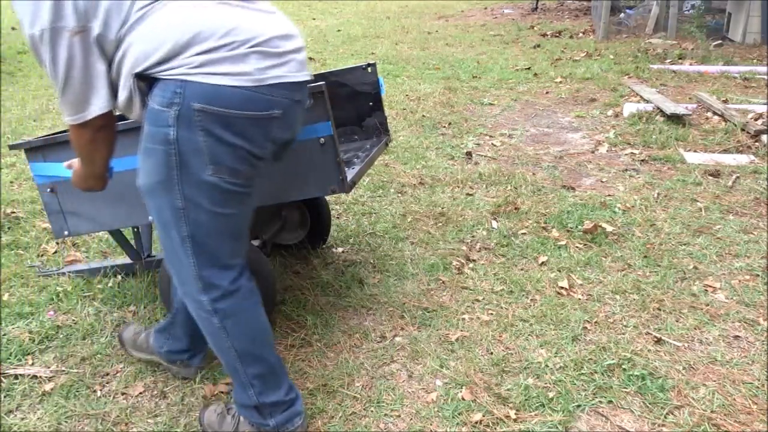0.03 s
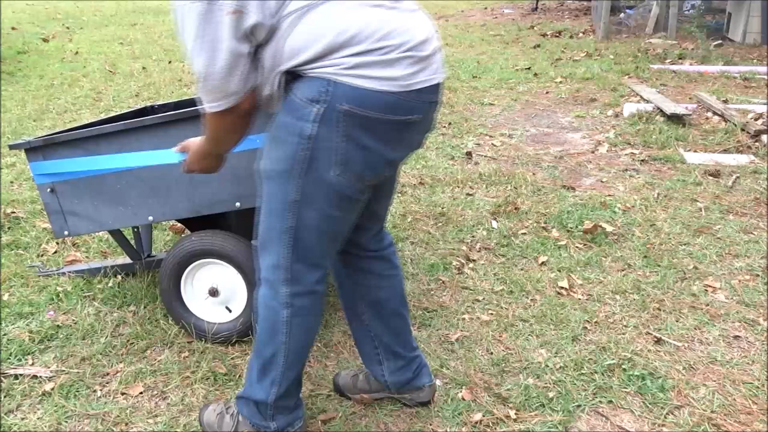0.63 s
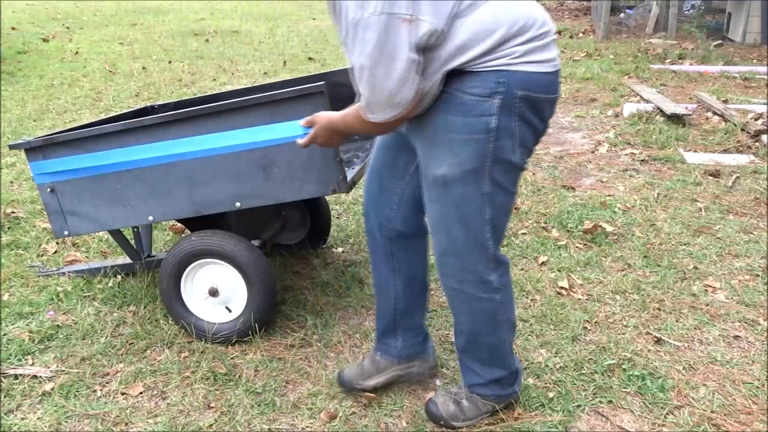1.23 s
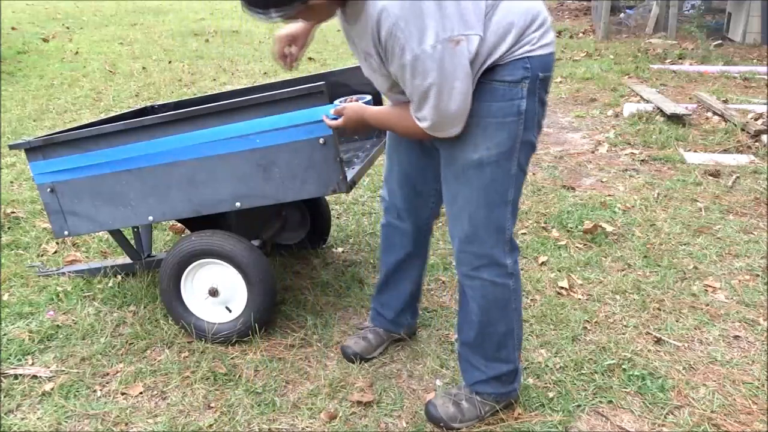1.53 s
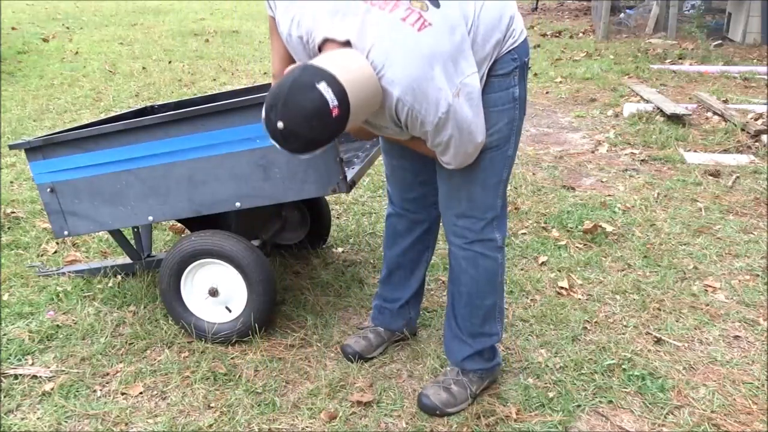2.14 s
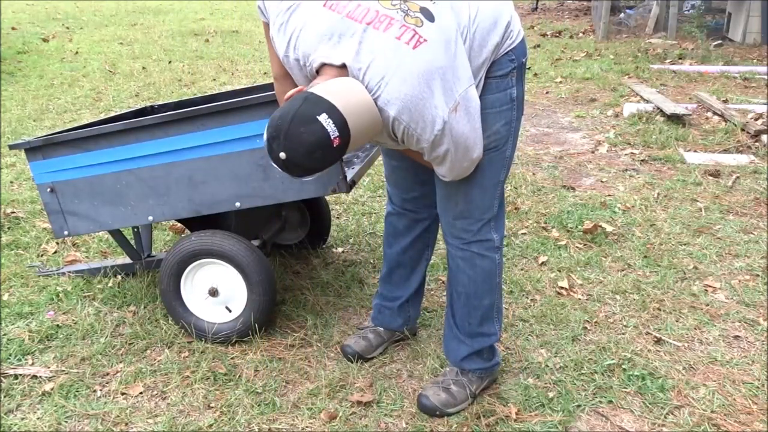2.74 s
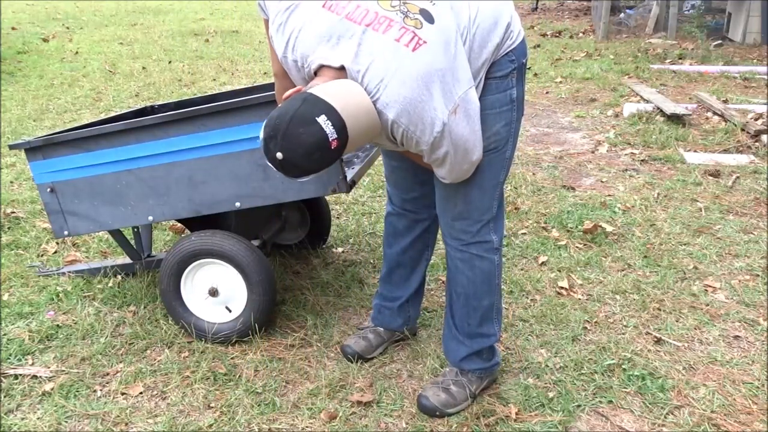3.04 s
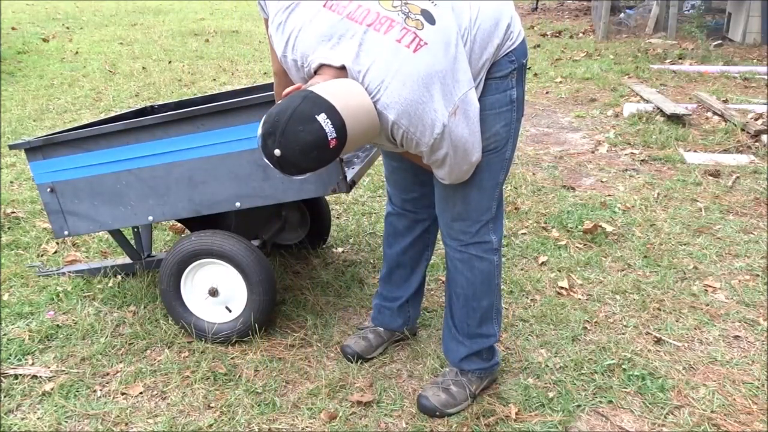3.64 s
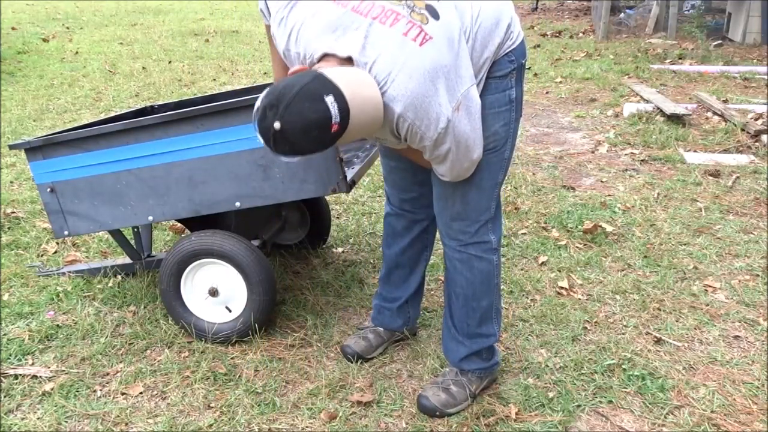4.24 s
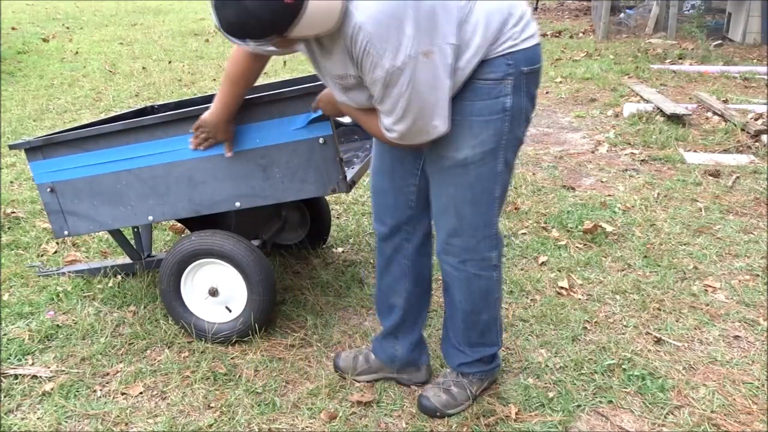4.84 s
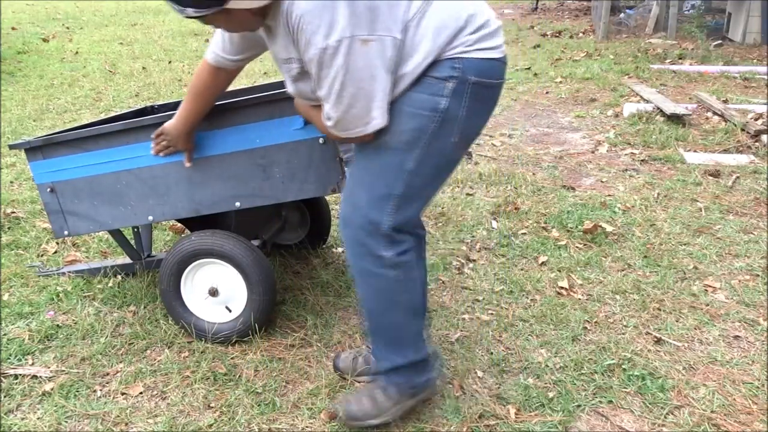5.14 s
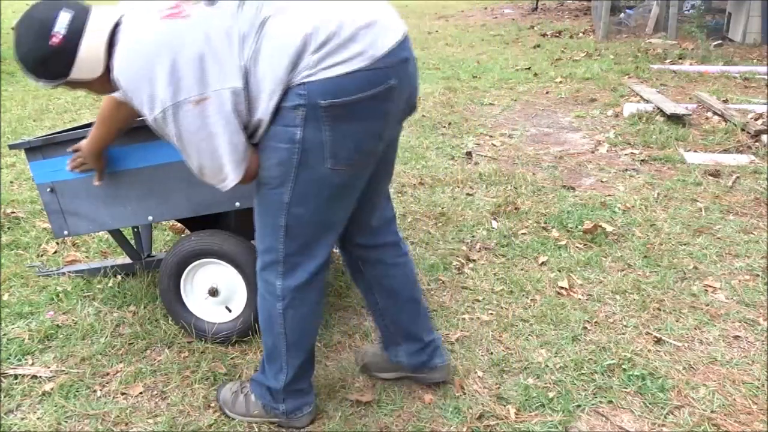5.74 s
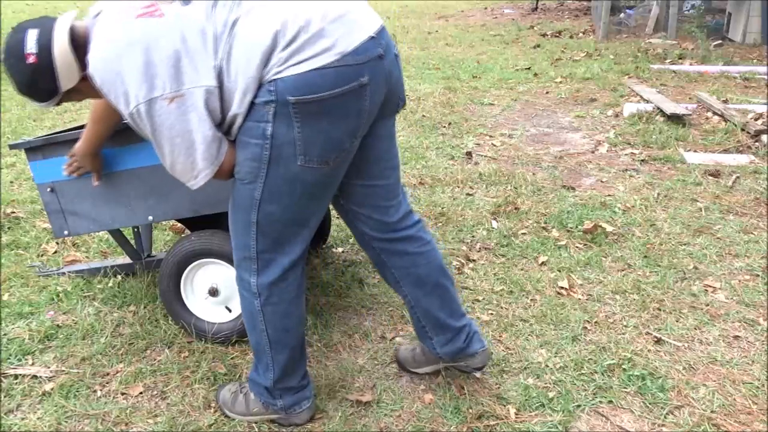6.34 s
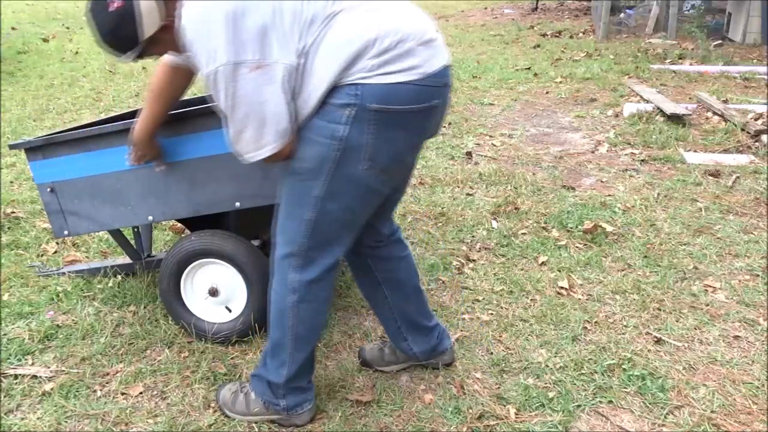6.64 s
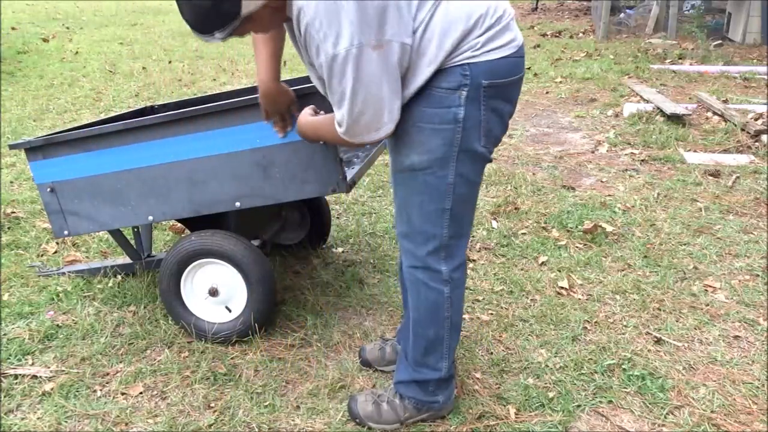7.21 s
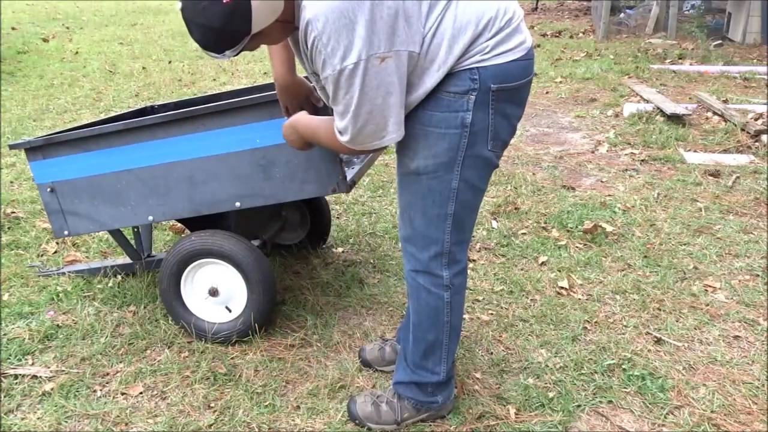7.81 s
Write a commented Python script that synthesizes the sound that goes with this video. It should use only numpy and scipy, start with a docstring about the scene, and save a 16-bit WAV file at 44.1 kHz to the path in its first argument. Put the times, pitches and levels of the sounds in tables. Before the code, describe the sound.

Masking tape rasps off a roll, then a hand rubs it onto a steel cart with soft knocks, while faint birds chirp outdoors.

```python
"""Masking tape is ripped off its roll along the side of a steel garden cart, then rubbed down by hand.
Glue threads snap in stick-slip bursts and drum the taut strip; skin catches on the tape's crepe ridges.
Hand and roll bump the panel now and then, exciting its damped modes. Birds whistle and chirp in the
trees around the lawn. Close by, a small camera motor kicks its housing 30 times a second, with one
short rest, over soft wind and hiss."""
import sys
import numpy as np
from scipy import signal
from scipy.fft import rfft, irfft, next_fast_len
from scipy.io import wavfile
from scipy.ndimage import uniform_filter1d

SR = 44100
rng = np.random.default_rng(int(sys.argv[2]) if len(sys.argv) > 2 else 0)


def output_pcm(signal):
    """Save a mono or channel-first signal as 16-bit PCM at the path in sys.argv[1].

    Samples are clipped to [-1, 1] before scaling.
    """
    pcm = np.clip(np.atleast_2d(signal).T, -1, 1) * 32767
    wavfile.write(sys.argv[1], SR, np.round(pcm).astype(np.int16))


N = 347067
T = np.arange(N) / SR
PADDED = next_fast_len(N, real=True)
BINS = np.fft.rfftfreq(PADDED, 1 / SR)


def amp(db):
    """Amplitude ratio of a level in decibels."""
    return 10 ** (np.asarray(db) / 20)


def unit_rms(x):
    """Normalisation to an rms of 1."""
    return x / np.sqrt(np.mean(x ** 2) + 1e-20)


def response(curve):
    """Gain in every bin, interpolated over log frequency from rows of frequency_hz, gain_db."""
    hz, db = np.transpose(curve)
    return amp(np.interp(np.log(BINS + 1), np.log(hz + 1), db))


def colour(x, gain):
    """Zero-phase filtering: the spectrum is multiplied by a gain."""
    return irfft(rfft(x, PADDED) * gain, PADDED)[:N]


def split(x, hz):
    """Crossover into a low and a high band, each of rms 1."""
    low = colour(x, 1 / (1 + (BINS / hz) ** 8))
    return unit_rms(low), unit_rms(x - low)


def add(mix, start_s, sound):
    """Superposition of a sound on the mix, in place."""
    part = mix[max(round(start_s * SR), 0):][:len(sound)]
    part += sound[:len(part)]


def wobble(rate_hz, size=N):
    """Random modulation: low-passed noise of rms near 1."""
    padded = next_fast_len(size, real=True)
    hz = np.fft.rfftfreq(padded, 1 / SR)
    spectrum = rfft(rng.standard_normal(padded)) / np.sqrt(1 + (hz / rate_hz) ** 6)
    return unit_rms(irfft(spectrum, padded))[:size]


def ring(x, modes):
    """Forced response of damped modes, given as frequency_hz, bandwidth_hz, gain_db."""
    out = 0
    for hz, width_hz, db in modes:
        radius = np.exp(-np.pi * width_hz / SR)
        pole = radius * np.exp(2j * np.pi * hz / SR)
        out = out + amp(db) * signal.lfilter([1 - radius], [1, -pole], x).imag
    return out


def shot_noise(per_s, spread_db=2.5):
    """A Poisson train of tiny snaps, a few much larger than the rest."""
    size = amp(spread_db * np.minimum(rng.exponential(1, N), 4))
    return unit_rms(size * rng.choice([-1, 1], N) * (rng.random(N) < per_s / SR))


def gliding_resonances(x, track, width_hz, unsteady, patchy_db):
    """Time-varying filter: two narrow resonances glide while changing contact mottles the spectrum."""
    hz, t, spectra = signal.stft(x, SR, nperseg=1024)
    times, *columns = np.transpose(track)
    low_hz, high_hz, boost_db = (np.interp(t, times, column) for column in columns)
    patches = uniform_filter1d(rng.standard_normal(spectra.shape), size=5, axis=0)
    patches = unit_rms(uniform_filter1d(patches, size=7, axis=1))
    peaks = sum(np.exp(-((hz[:, None] - centre) / width_hz) ** 2) for centre in (low_hz, high_hz))
    gain_db = boost_db * peaks * (1 + unsteady * patches[::-1]) + patchy_db * patches
    return signal.istft(spectra * amp(gain_db), SR)[1][:N]


def peel(slip_hz=70, rasp_db=-4.0, release_s=0.08):
    """Stick-slip: snapping glue threads drum the taut strip, whose resonances shift as it lengthens."""
    # spectra of the short, half-length and long strip: frequency_hz, gain_db
    short = [(88, -49), (150, -21), (264, -15.5), (543, -2.5), (727, -0.5), (883, -9.5), (1250, -3),
             (1750, -2), (2740, -9.5), (3070, -6), (3460, -12), (6700, -8), (14900, -15.5), (15800, -10.5)]
    half = [(88, -55), (150, -27), (285, -6), (347, -16.5), (405, -1.5), (512, 0), (901, -16.5), (1070, -8),
            (1680, -16), (2080, -10.5), (2740, -13.5), (8640, -15), (11600, -24.5), (14600, -18.5),
            (15800, -22)]
    long = [(88, -55), (150, -23), (340, -7), (474, -5), (532, -5.5), (833, -6), (1010, -19), (1350, -13),
            (1560, -4), (1800, -9.5), (2250, -14), (2850, -10.5), (3350, -11), (3900, -14), (4450, -13),
            (8640, -8), (11600, -14), (14600, -11), (15800, -15)]
    # fizz of the glue for those three lengths: gain_db
    fizz_db = [-5.5, -8, -5.5]
    # turning points of the blend between the three spectra: time_s
    stage_times = [.12, .4, .72, .92]
    # sinking upper resonances of the strip: time_s, low_hz, high_hz, boost_db
    strip_resonances = [(.15, 3500, 5030, 4), (.75, 3280, 4400, -4.5), (1.02, 2880, 3950, 11),
                        (1.45, 2660, 3770, 4.5)]
    # pulling effort: time_s, level_db
    effort = [(0.0, -29), (0.12, -29), (0.202, -33), (0.272, -32), (0.332, -38), (0.36, -33), (0.396, -39),
              (0.494, -33.5), (0.684, -35.5), (0.724, -32), (1.16, -33.5), (1.174, -38.5), (1.27, -37),
              (1.284, -41), (1.322, -35), (1.442, -37.5), (1.512, -46), (1.66, -58.5)]
    snaps = shot_noise(per_s=6500) * amp(1.03 * wobble(slip_hz))
    flap = amp(0.23 * wobble(slip_hz))
    stage = np.interp(T, stage_times, [0.058, 0.87, 0.56, 2])  # 0 short, 1 half, 2 long
    rasp, fizz = 0, 0
    for k, strip in enumerate([short, half, long]):
        low, high = split(colour(snaps, response(strip)), hz=2680)
        share = np.maximum(1 - abs(stage - k), 0)
        rasp += share * low
        fizz += share * amp(fizz_db[k]) * high
    fizz = gliding_resonances(fizz, strip_resonances, width_hz=140, unsteady=0.24, patchy_db=3)
    pull = amp(np.interp(T, *np.transpose(effort)))
    slackening = np.exp(-np.clip((T - effort[-1][0]) / release_s, 0, 20))
    return (amp(rasp_db) * rasp * flap + fizz) * pull * slackening


def camera_motor(kick_hz=29.97, first_s=0.00397, rattle_cycles=0.74, rattle_db=-1.5, fade_s=0.15):
    """Periodic excitation: a kick and a decaying rattle ring the camera housing once a cycle."""
    # housing modes: frequency_hz, bandwidth_hz, gain_db
    housing = [(435, 45, 9.5), (607, 140, 1)]
    # spells of running: start_s, stop_s, start_db, stop_db
    runs = [(-.2, 3.7, -54.5, -66.5), (4.5, 8.0, -68, -61.5)]
    cycle = (T - first_s) * kick_hz % 1
    rattle = rng.standard_normal(N) * np.exp(-cycle / rattle_cycles)
    kicks = 1. * (np.diff(cycle, prepend=0) < 0)
    pulses = ring(ring(kicks, housing), [(479, 150, 0)])  # each swells over a few milliseconds
    buzz = unit_rms(pulses) + amp(rattle_db) * unit_rms(ring(rattle, housing))
    running = 0
    for start, stop, *levels_db in runs:
        gate = np.clip(.5 + np.minimum(T - start, stop - T) / fade_s, 0, 1)
        running += gate * amp(np.interp(T, [start, stop], levels_db))
    return unit_rms(colour(buzz, BINS > 280)) * running


def rumble_and_hiss(hiss_db=-62.5, rumble_db=-66, flutter_db=-62.5, lumpy_db=0.85):
    """Incoherent addition: strip thrum, then gusts, add power to a lumpy breeze under an even hiss."""
    # spectra of the hiss with its far outdoor wash, and of the wind: frequency_hz, gain_db
    air = [(200, -4.5), (330, 0.5), (500, -0.5), (1000, -13), (2500, -7), (3400, -4.5), (3950, -12),
           (4400, -7), (4900, -13), (6600, -15), (7650, -8.5), (7850, -3.5), (8050, -11), (8500, -9),
           (9700, 2), (10900, -14), (14000, -11)]
    wind = [(12, -44), (20, -1), (27, -23), (43, -2), (59, -3), (129, 3.5), (160, -4), (260, -13),
            (340, -43), (570, -120)]
    # low swells, the strip's thrum in the peel, then wind gusts: peak_s, width_s, rumble_db, flutter_db
    swells = [(.2, 0.19, -63, -55), (1.05, 0.58, -68, -59.5), (1.58, 0.028, -63, -54),
              (3.85, 0.18, -63.5, -82), (4.06, 0.043, -66, -58), (5.1, 0.16, -63, -78),
              (5.83, 0.057, -50, -69), (6.5, 0.44, -57, -77), (7.1, 0.14, -59, -67)]
    hiss = unit_rms(colour(rng.standard_normal(N), response(air)))
    rumble, flutter = split(colour(rng.standard_normal(N), response(wind)), hz=71)
    power = amp([[rumble_db], [flutter_db]]) ** 2
    for peak_s, width_s, deep_db, light_db in swells:
        power = power + amp([[deep_db], [light_db]]) ** 2 * np.exp(-((T - peak_s) / width_s) ** 2)
    low_end = (np.sqrt(power) * [rumble, flutter]).sum(axis=0)
    return amp(hiss_db) * hiss + low_end * amp(lumpy_db * wobble(4.3))


def crackles(decay_s=0.0006, gain_db=-5.0):
    """Broadband transients: single wrinkles of tape pop in brief, high-passed bursts of noise."""
    # wrinkle pops: start_s, relative_db
    pops = [(0.0495, -23), (0.0854, -30), (1.0357, -23), (1.184, -19.5), (1.381, -21), (1.436, -25),
            (4.532, -26), (4.9845, -25.5), (5.431, -31), (7.037, -19), (7.063, -21)]
    out, t = np.zeros(N), T[:1024]
    for start, db in pops:
        add(out, start, amp(db + gain_db) * rng.standard_normal(len(t)) * np.exp(-t / decay_s))
    return colour(out, BINS / np.hypot(BINS, 3000))


def stroke(start_s, length_s, db, swell_db, release_s, attack_s=0.07):
    """Friction envelope: the hand gets up to speed, swells or slackens its stroke, then lifts."""
    t = T - start_s
    along = np.clip(t / length_s, 0, 1)
    attack = np.clip(t / attack_s, 0, 1)
    release = np.exp(-np.clip((t - length_s) / release_s, 0, 10) ** 1.1)
    return attack * amp(db + swell_db * (along - .5)) * release


def rub(scrape_db=-1.28, pressure_share=0.27):
    """Sliding friction: skin catches on the tape's crepe ridges; firm pressure also drives the panel."""
    # spectrum of rubbed tape on steel: frequency_hz, gain_db
    friction = [(120, -43), (200, -7.5), (353, -3), (379, -0.5), (490, -4), (567, 0), (1000, -9),
                (1400, -7), (1970, -4.5), (2190, -2.5), (3160, -1), (4640, -6), (8800, 0.5), (11200, -6.5),
                (14200, -5.5), (15800, -7)]
    # hand strokes: start_s, length_s, hiss_db, swell_db, release_s, pressure_db, sheen_db
    strokes = [(1.686, 0.17, -54.5, 3.5, 0.036, -7.5, 4), (1.888, 0.28, -66.5, -10, .03, -3, 3),
               (4.196, 0.29, -57.5, 3, .04, -10.5, 0), (4.412, 0.61, -53, 6.5, 0.12, -7, 2),
               (4.504, 0.04, -44, 0, .012, -20, 0), (4.57, .035, -43, 0, .012, -23, -2),
               (5.053, 0.39, -54, 9.5, 0.048, -3.5, -2), (5.437, 0.5, -51, 0.5, .04, -6, -3),
               (5.89, 0.12, -48.5, -2, 0.087, -7, 0), (6.017, 0.27, -73.5, -9, 0.024, 15.5, 11),
               (6.25, 0.088, -47.5, -2, 0.026, -32, -1), (6.302, 0.67, -47.5, 4, 0.03, -11, -9),
               (6.892, 0.26, -44.5, -2, 0.039, -10.5, 2), (7.152, 0.34, -57.5, -9, 0.026, -4.5, 3),
               (7.35, 0.11, -54, 1, 0.014, -35, 10.5), (7.466, 0.46, -68, -6, .05, -21, 2)]
    # faint gliding resonances that colour the rubbing hiss: time_s, low_hz, high_hz, boost_db
    rub_resonances = [(4.6, 2670, 3150, 0.5), (5.1, 2580, 2970, 5), (5.9, 2210, 3120, 0),
                      (6.36, 2330, 4300, 6.5), (6.9, 2080, 3540, 3), (7.15, 2130, 3420, 0)]
    catches = colour(shot_noise(per_s=14000), response(friction))
    drum, bright = split(catches, hz=1010)
    scrape, treble = split(bright, hz=4720)
    hiss, sheen = split(treble, hz=11250)
    power = np.array([stroke(*row[:5]) for row in strokes]) ** 2
    band_gains = amp([(pressure_db, scrape_db + pressure_share * pressure_db, 0, sheen_db)
                      for *_, pressure_db, sheen_db in strokes])  # relative to the hiss band
    envelopes = np.sqrt(band_gains.T ** 2 @ power)
    sound = (envelopes * [drum, scrape, hiss, sheen]).sum(axis=0)
    return gliding_resonances(sound, rub_resonances, width_hz=150, unsteady=0.22, patchy_db=2.0)


def syrinx(length_s, pitches, jitter, taper, trill=0, trill_hz=160, overtone_db=-80):
    """Frequency modulation: a bird's note arcs through three pitches; a fast trill makes it buzz."""
    along = np.linspace(0, 1, int(length_s * SR))
    size = len(along)
    shake = wobble(440, size=32768)[:size]
    swing = np.sin(2 * np.pi * (trill_hz * T[:size] + rng.random()))
    arc_hz = np.polyval(np.polyfit([0, .5, 1], pitches, 2), along)
    phase = 2 * np.pi * np.cumsum(arc_hz * (1 + trill * swing + jitter * shake)) / SR
    tone = np.sin(phase) + amp(overtone_db) * np.sin(3.45 * phase)
    return unit_rms(tone * signal.windows.tukey(size, taper))


def tree_scatter(x, t60_s):
    """Multiple scattering: convolution with a decaying noise tail of unit energy."""
    tail = rng.standard_normal(SR) * amp(-60 * T[:SR] / t60_s)
    return signal.oaconvolve(x, tail / np.linalg.norm(tail))[:N]


def bird_whistles(sink_hz_per_s=1250, waver_hz=45, fence_s=0.068, fence_db=-7, flutter_db=2.0):
    """Nearly pure tones: sinking whistles, low hoots and a peep, amplitude-modulated by moving air."""
    # thin whistles: start_s, length_s, start_hz, midway_fall_share, level_db
    whistles = [(1.7, 0.23, 3530, 0.55, -61.5), (1.842, 0.26, 3196, 0.51, -62.5),
                (3.28, .17, 3470, 0.57, -65.5), (3.429, 0.33, 3490, .3, -68),
                (3.67, 0.45, 3680, 0.37, -71.5), (3.7, 0.14, 3200, 0.66, -69),
                (6.228, 0.164, 3420, -.1, -69), (7.23, .15, 3500, .1, -64), (7.695, 0.23, 3400, 0.11, -61)]
    # low arched notes, all alike: start_s, level_db
    hoots = [(2.273, -60.5), (2.649, -57.5), (3.043, -56.5)]
    out = np.zeros(N)
    for start, length, hz, midway, db in whistles:
        pitches = hz - sink_hz_per_s * length * np.array([0, midway, 1])
        add(out, start, amp(db) * syrinx(length, pitches, jitter=waver_hz / hz, taper=0.31))
    add(out, fence_s, amp(fence_db) * out)  # a fence reflects the whistles
    for start, db in hoots:
        add(out, start, amp(db) * syrinx(0.115, [1222, 1450, 1150], jitter=0.045, taper=0.37))
    peep = amp(-61) * syrinx(0.03, [6800] * 3, jitter=0.023, taper=0.6)
    add(out, 2.105, peep)
    out *= amp(flutter_db * wobble(57))
    return out + amp(-8) * tree_scatter(out, t60_s=0.79)


def panel_bumps(width_hz=380):
    """Modal response: soft knocks ring the damped steel side; the spot struck selects the modes."""
    # knocks of hand and roll: start_s, level_db, t60_s, centre_hz, rise_s
    knocks = [(1.825, -49, 0.3, 780, 0.0088), (4.876, -44, 0.11, 420, 0.0022),
              (5.595, -44.5, 0.093, 596, 0.0025), (6.617, -33.5, 0.06, 810, 0.0047),
              (7.066, -36.5, 0.21, 430, 0.018), (7.095, -38, 0.28, 795, 0.015)]
    # panel modes: frequency_hz, bandwidth_hz, gain_db
    panel = [(430, 79, -16), (606, 160, -2), (870, 390, 10), (1090, 220, 4)]
    out, t = np.zeros(N), T[:8192]
    for start, db, t60, hz, rise_s in knocks:
        modes = ring(rng.standard_normal(len(t)), panel)
        body = unit_rms(ring(modes, [(hz, width_hz, 0)]))
        add(out, start, body * amp(db - 60 * t / t60) * (1 - np.exp(-t / rise_s)))
    return out


def bird_chips(attack_s=0.012, fade_db=-11, fence_s=0.075, fence_db=-8):
    """Trill sidebands make falling calls buzz; trees scatter them and a fence reflects the sharp one."""
    # buzzy chips: start_s, length_s, middle_hz, fall_share, level_db
    chips = [(2.55, 0.13, 2600, 0.23, -54), (3.164, 0.11, 2546, 0.32, -51), (3.985, .135, 2493, 0.19, -54),
             (4.69, 0.11, 2313, .42, -50), (5.918, 0.094, 2590, 0.31, -48.5)]
    # pitch offsets as shares of the fall: start, middle, end
    contour = [.68, 0, -0.285]
    # a sharp call holds high, then plunges: start_s, length_s, start_hz, middle_hz, end_hz, level_db
    sharp_call = [(3.061, 0.054, 3890, 3850, 3680, -49), (3.063, 0.039, 5270, 4780, 4030, -55.5),
                  (3.076, .045, 3933, 3280, 1850, -43.5)]
    soft, sharp = np.zeros((2, N))
    for start, length, hz, fall, db in chips:
        pitches = hz * (1 + fall * np.array(contour))
        call = syrinx(length, pitches, jitter=0.044, taper=0.086, trill=0.11, overtone_db=-10)
        t = T[:len(call)]
        envelope = np.minimum(t / attack_s, 1) * amp(fade_db * t / length)
        add(soft, start, amp(db) * unit_rms(call * envelope))
    for start, length, *pitches, db in sharp_call:
        add(sharp, start, amp(db) * syrinx(length, pitches, jitter=0.038, taper=0.2, trill=0.07))
    add(sharp, fence_s, amp(fence_db) * colour(sharp, (BINS > 3000) & (BINS < 4300)))
    scattered = tree_scatter(amp(-7) * soft + amp(-4) * sharp, t60_s=0.68)
    beak_lowpass = 1 / (1 + (BINS / 9800) ** 16)
    return colour(soft + sharp + scattered, beak_lowpass)


def diffuse(x):
    """Diffuse field: the same sound arrives from all round, with equal power and random phases."""
    spectra = signal.stft(x, nperseg=512)[2]
    scrambled = spectra * np.exp(2j * np.pi * rng.random(spectra.shape))
    return np.std(x) * unit_rms(signal.istft(scrambled)[1][:N])


def scene():
    """Mid-side stereo: peel and birds lie ahead, a little left; rubbing and the yard sound wider."""
    # sideways scatter of each group: frequency_hz, side_over_mid_db
    ahead_width = [(200, -14), (400, -15.5), (2400, -12.5), (4400, -22.5), (15000, -22.5)]
    rub_width = [(200, -8), (400, -6), (1300, -4.5), (2400, -7.5), (4400, -93), (15000, -11)]
    yard_width = [(60, -15), (110, -14.5), (200, -8), (700, 1.5), (1300, 6.5), (2400, 0.5), (4400, -0.5),
                  (8100, -17), (9700, 1), (12000, -10.5)]
    # leftward lean: frequency_hz, left_over_right_db
    balance = [(60, -1), (110, 2), (200, 0), (380, 3), (700, 2.5), (1290, 3), (2380, 1.5), (4400, 2.5),
               (8120, -1), (15000, 1.5)]
    tape = peel() + crackles() + panel_bumps()
    hand = rub()
    birds = bird_chips() + bird_whistles()
    yard = camera_motor() + rumble_and_hiss()
    groups = [(tape + birds, ahead_width), (hand, rub_width), (yard, yard_width)]
    mid = tape + hand + birds + yard
    side = sum(colour(diffuse(sound), response(width)) for sound, width in groups)
    lean = np.sqrt(response(balance))
    return np.array([colour(mid, lean) + side, colour(mid, 1 / lean) - side])


def record(dry, cutoff_hz=15880):
    """Band limiting by a steep linear-phase low-pass filter."""
    lowpass = signal.firwin(511, cutoff_hz, window=("kaiser", 9), fs=SR)
    return signal.oaconvolve(dry, lowpass[None], "same")


dry = scene()
out = record(dry)
output_pcm(out)
```